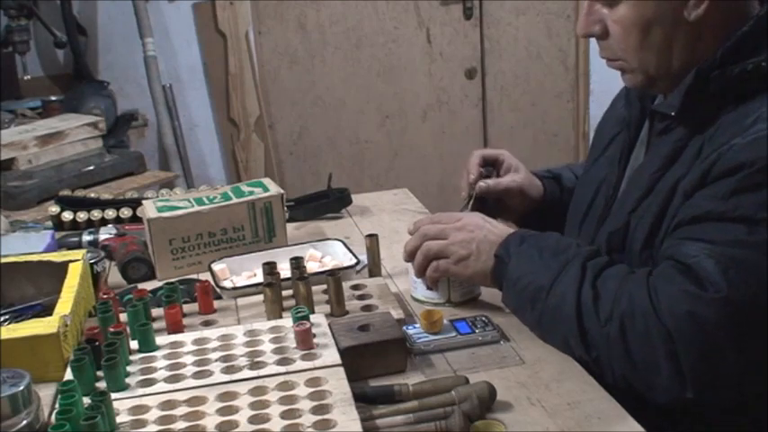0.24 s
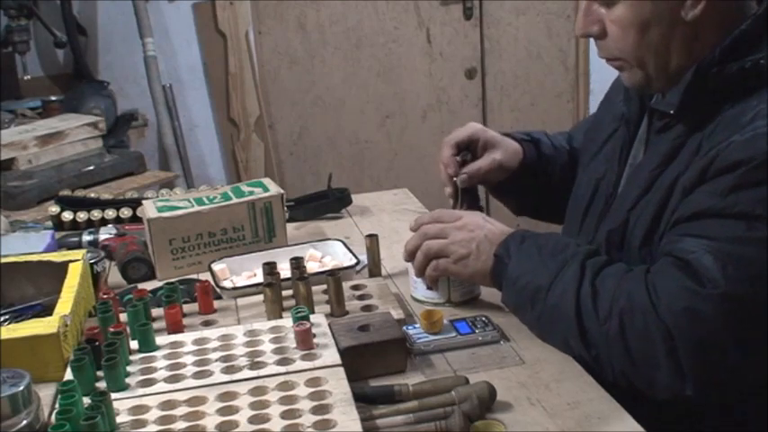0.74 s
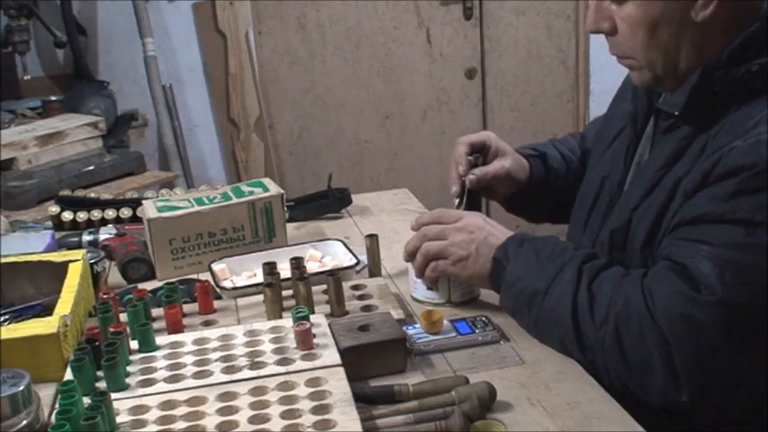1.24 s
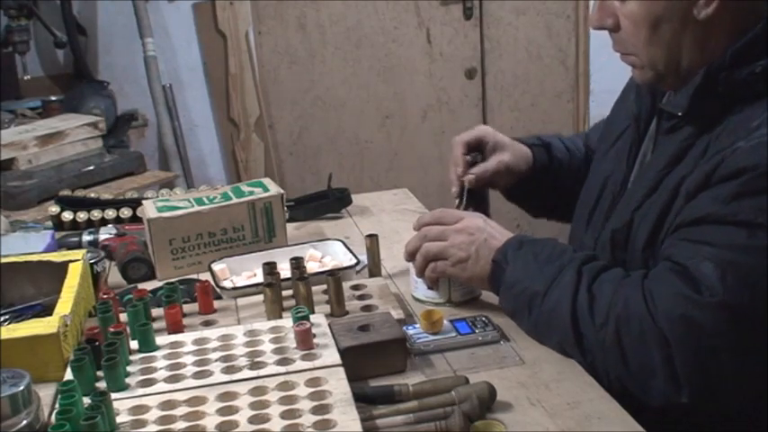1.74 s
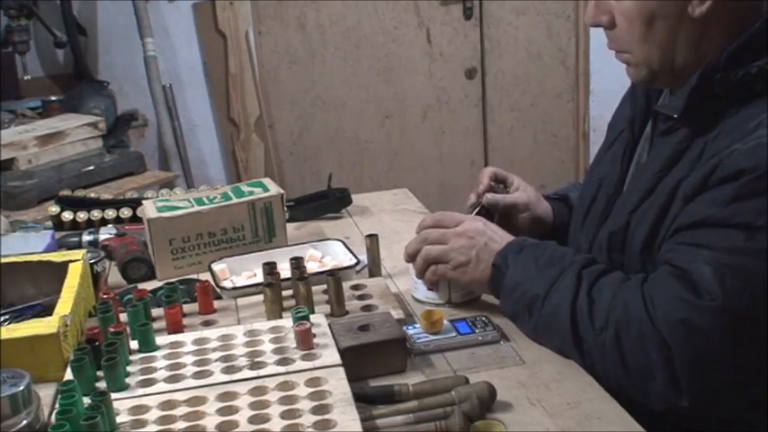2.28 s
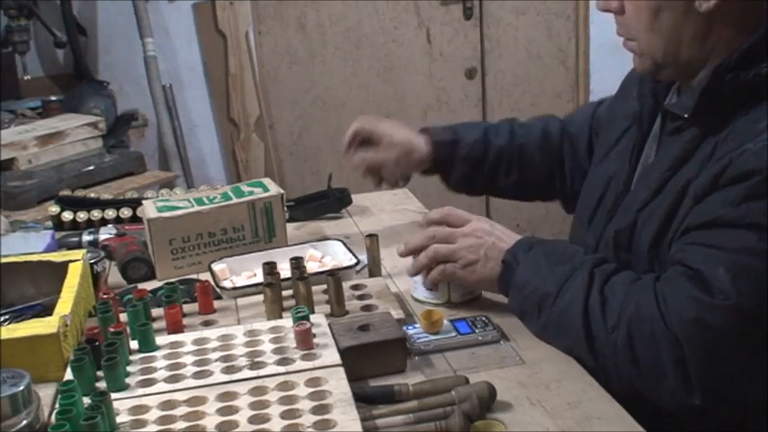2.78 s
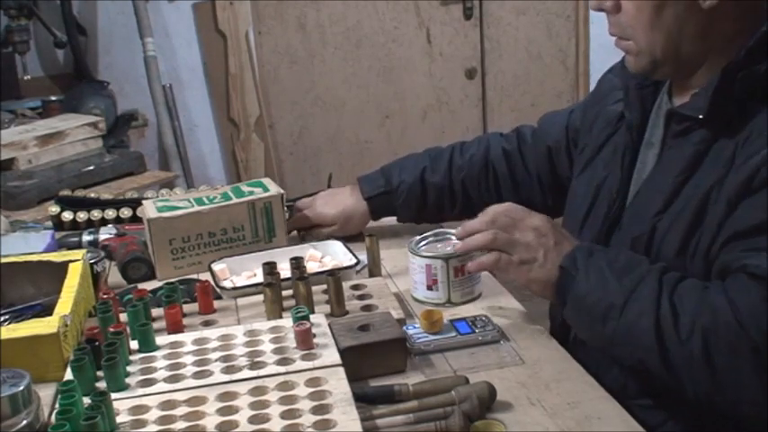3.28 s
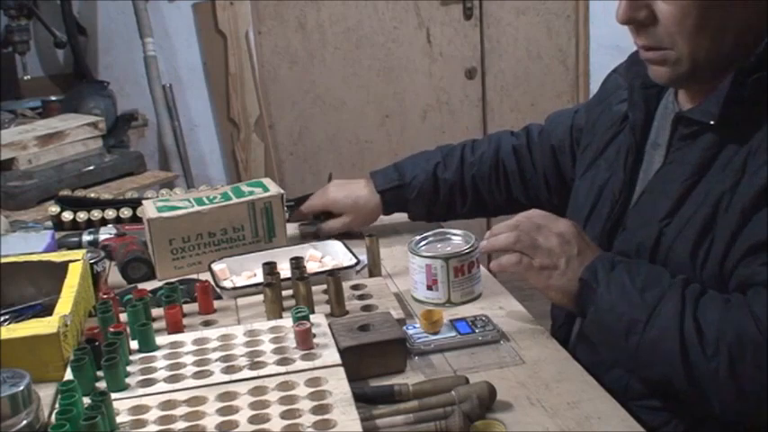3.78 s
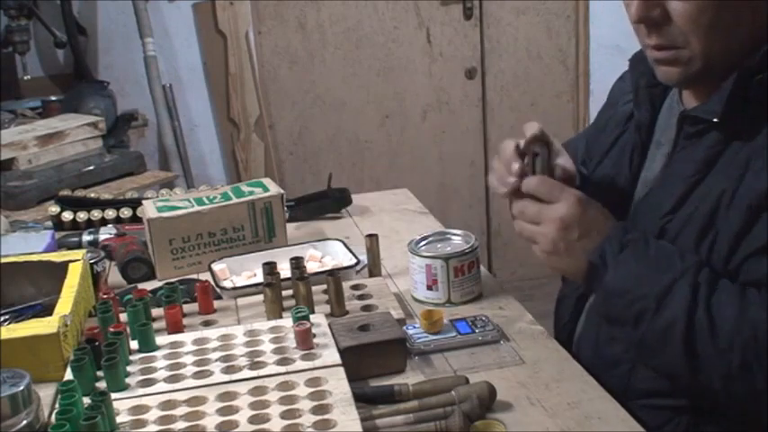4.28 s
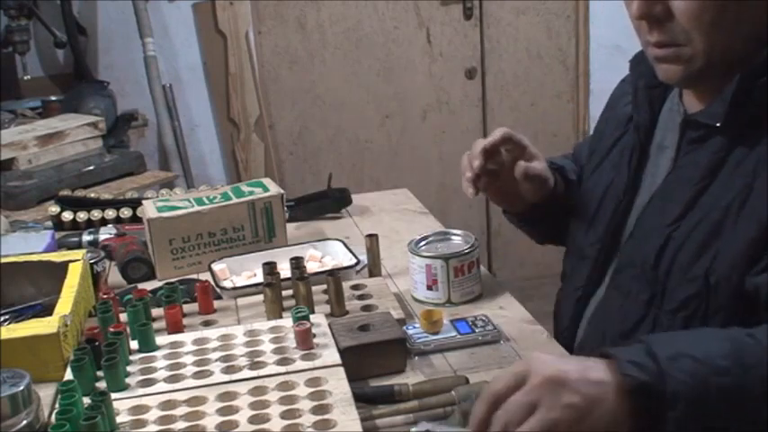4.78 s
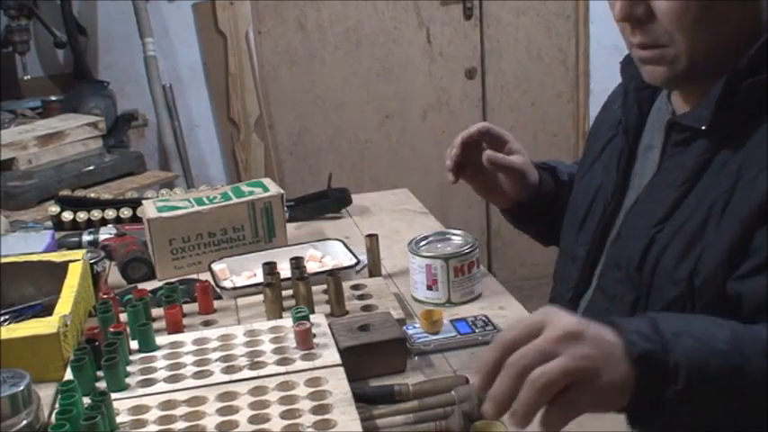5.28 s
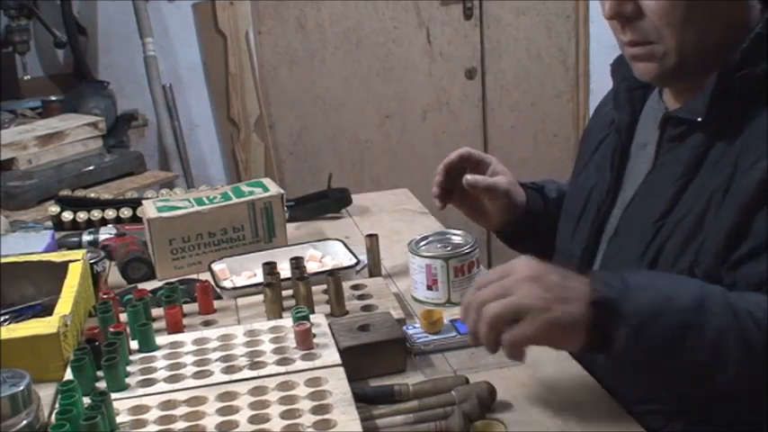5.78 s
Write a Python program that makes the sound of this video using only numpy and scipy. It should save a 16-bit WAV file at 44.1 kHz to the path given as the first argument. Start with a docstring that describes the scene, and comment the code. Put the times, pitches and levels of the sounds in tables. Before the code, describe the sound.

Sharp clinks and ringing snaps of a knife levering a small tin's lid, followed by hollow knocks on a wooden workbench.

```python
"""Knife on a paint tin lid

A knife levers at the lid of a small tin on a wooden bench: the blade slips with a crack, tin and steel
ring, the tin thumps back down. A tool knocks on the bench, the knife snaps shut, the tool is laid down.
A padded jacket rustles with the arm; the small, hard workshop rings after each blow over a faint hum."""
import sys
import numpy as np
from scipy import signal
from scipy.fft import rfft, irfft, next_fast_len
from scipy.io import wavfile
from scipy.ndimage import uniform_filter1d

SR = 44100
rng = np.random.default_rng(int(sys.argv[2]) if len(sys.argv) > 2 else 0)


def file_out(sig):
    """Save sig as 16-bit WAV at sys.argv[1]."""
    # one column per channel
    cols = np.atleast_2d(sig).T
    # limit, then scale
    lim = np.clip(cols, -1, 1)
    pcm = np.round(lim * 32767).astype(np.int16)
    wavfile.write(sys.argv[1], SR, pcm)


N = 266275
TIME_S = np.arange(N) / SR
RING_S = np.arange(40960) / SR  # time axis of one blow
# low room modes: pitch_hz, level_db, t60_s
ROOM_MODES = [(97, -19, .55), (140, -16, .55), (173, -8, .52), (288, 1.5, .42), (416, -1, .42)]
# bright spectrum of fabric and knife click: freq_hz, gain_db
BRIGHT_COLOUR = [(200, -15.5), (900, 0), (2000, 0), (3200, 0), (5000, -1.5), (8000, -1), (11000, -8),
                 (13000, -3), (16000, -16.5)]
# sleeve flick, then knife click: start_s, level_db, contact_s
SNAPS = [(2.799, -28, 0.0086), (4.478, -27, 0.0032)]


def undb(db):
    """Decibels to gain."""
    return 10 ** (np.asarray(db) / 20)


def add(out, start_s, sound):
    """Mix a sound in at start_s."""
    start = max(int(start_s * SR), 0)
    out[:, start:start + sound.shape[1]] += sound[:, :N - start]


def shape(x, points):
    """Minimum-phase filter through (freq_hz, gain_db) points."""
    n = next_fast_len(x.shape[-1], True)
    hz, db = np.transpose(points)
    bins_hz = np.arange(n // 2 + 1) * SR / n
    gain_db = np.interp(np.log(bins_hz + 1), np.log(hz), db)
    cepstrum = irfft(np.log(undb(gain_db)), n)
    cepstrum[1:n // 2] *= 2
    cepstrum[n // 2 + 1:] = 0
    return irfft(rfft(x, n) * np.exp(rfft(cepstrum)), n)[:, :x.shape[-1]]


def diffuse(size, width):
    """Stereo noise; width is side over mid."""
    mid, side = rng.standard_normal((2, size))
    return np.array([mid + width * side, mid - width * side])


def walk(rate_hz):
    """Slow random drift, spread near 1."""
    knots = rng.standard_normal(4096)
    return np.interp(TIME_S * rate_hz, np.arange(len(knots)), knots)


def ripple(depth_db, step_hz, from_hz):
    """Crowded upper resonances as (freq_hz, gain_db) points."""
    hz = np.arange(1, 400) * step_hz
    return list(zip(hz, depth_db * rng.standard_normal(len(hz)) * np.clip(hz / from_hz - 1, 0, 1)))


def flatten(x, smooth_hz):
    """Level the broad humps of a burst's spectrum, at unit energy."""
    power = uniform_filter1d(abs(rfft(x.mean(axis=0))) ** 2, int(smooth_hz * x.shape[1] / SR))
    hz = np.linspace(1, SR / 2, len(power))
    return shape(x, np.column_stack([hz, -10 * np.log10(abs(power) + 1e-9)]))


def room_tail(slips, t60_s):
    """Slip energy fills the room and dies away."""
    stored = signal.lfilter([1], [1, -np.exp(-2 * np.log(1000) / (t60_s * SR))], slips ** 2)
    return np.sqrt(stored / stored.sum()) * diffuse(len(RING_S), width=.21)


def blow(contact_s, direct, t60_s, grit_db):
    """A burst of tiny slips plus its room tail, whose treble dies first."""
    grit = undb(grit_db * np.repeat(rng.standard_normal(len(RING_S) // 32), 32))
    slips = np.exp(-RING_S / contact_s) * grit
    crack = flatten(slips * diffuse(len(RING_S), width=.1), smooth_hz=486)
    low, high = (signal.butter(2, 5300, kind, fs=SR, output="sos") for kind in ("low", "high"))
    room = signal.sosfilt(low, room_tail(slips, t60_s))
    room += signal.sosfilt(high, room_tail(slips, .75 * t60_s))
    return (direct * crack + room) / np.hypot(direct, 1)


def ring(modes, swell_s, scatter_db, detune=.0022):
    """Decaying modes that swell as reflections gather; each blow weights them anew."""
    side_rad = .17 * np.array([[1], [-1]])
    out = 0
    for hz, db, t60_s in modes:
        size, pitch, lag = rng.standard_normal(3)
        phase = 2 * np.pi * (hz * (1 + detune * pitch) * RING_S + rng.random())
        decay = undb(db + scatter_db * size) * np.exp(-np.log(1000) * RING_S / t60_s)
        out = out + decay * np.sin(phase + lag * side_rad)
    return out * (1 - np.exp(-RING_S / swell_s))


def tone(x, centres_hz, bass_db, body_db, *upper_db):
    """A heavy push brings out bass, a sharp edge treble; the third band stays at 0 dB."""
    return shape(x, list(zip(centres_hz, (bass_db, body_db, 0, *upper_db))))


def add_snap(out, start_s, db, contact_s):
    """Mix in a short, bright burst."""
    burst = blow(contact_s, direct=1, t60_s=.25, grit_db=-1)
    add(out, start_s, undb(db) * shape(burst, BRIGHT_COLOUR))


def workshop():
    """Quiet room air from all around and a faint, wavering hum."""
    # air spectrum: freq_hz, gain_db
    air_colour = [(15, -43.5), (25, -1.5), (107, -10.5), (126, -17.5), (305, -7.5), (359, -12.5),
                  (567, -10), (722, -12), (782, -4), (848, -13), (1170, -10), (1410, -15), (2360, -16),
                  (3830, -21.5), (15500, -30.5)]
    # hum partials: pitch_hz, relative_db
    partials = [(769.8, -78.5), (909.8, -75.5), (1180, -86), (1330, -86), (1680, -88)]
    air = shape(diffuse(N, width=.78), air_colour)
    hum = 0
    for hz, db in partials:
        peak = np.sqrt(2) * undb(db - 2 + 2 * walk(8.8))
        hum += peak * np.sin(2 * np.pi * hz * TIME_S + 1.1 * walk(16))
    return air / air.mean(axis=0).std() * undb(-68 + .5 * walk(6.8)) + hum


def jacket():
    """Smooth fabric slides on itself as the arm speeds up and slows; the sleeve flicks once."""
    # arm movements: middle_s, length_s, level_db
    moves = [(0, .6, -70.5), (1.05, 0.34, -75), (2.3, 1.5, -70.5), (3.13, 1, -63), (4.3, 1.13, -61.5),
             (5.202, 0.67, -68.5), (6, 0.53, -74)]
    rest_db = -78.5
    hiss = shape(diffuse(N, width=.25), BRIGHT_COLOUR)
    speeds = [undb(db) * np.cos(np.pi * np.clip((TIME_S - middle_s) / length_s, -.5, .5))
              for middle_s, length_s, db in moves]
    rub = np.sqrt(undb(rest_db) ** 2 + np.sum(np.square(speeds), axis=0))
    out = hiss / hiss.std() * rub * undb(.8 * walk(32))
    add_snap(out, *SNAPS[0])
    return out


def strike_tin(db, tone_db, contact_s, ring_db, sheet):
    """A blow cracks through the thin sheet and rings the tin; its thrust booms in the room."""
    # tin modes: pitch_hz, level_db, t60_s
    tin_modes = [(481, 0, .36), (715, -15, .33), (790, -6.5, .46), (1130, -11, .25), (1272, -12, .22),
                 (1529, -.5, .27), (1634, -8, .24), (1671, -6, .26), (1883, -7.5, .24)]
    # crack spectrum: freq_hz, gain_db
    tin_colour = [(30, -9.5), (100, -12), (200, -8.5), (300, 4.5), (450, 10), (620, 9), (800, 9.5),
                  (1100, 12), (1550, 19), (1950, 7), (2350, 0.5), (4000, -4), (5800, -2.5), (9500, -14),
                  (13000, -18.5), (15000, -23)]
    # band centres: bass_hz, body_hz, neutral_hz, treble_hz, edge_hz
    bands_hz = [280, 850, 1700, 5500, 12500]
    burst = blow(contact_s, direct=.9, t60_s=.35, grit_db=5)
    crack = shape(shape(burst, tin_colour), sheet)
    # a gentle push favours the lowest mode
    modes = [(hz, mode_db + .2 * min(db, 0) * np.log2(hz / tin_modes[0][0]), t60_s)
             for hz, mode_db, t60_s in tin_modes]
    tin = undb(ring_db) * ring(modes, swell_s=.0008, scatter_db=2)
    boom = undb(db + tone_db[0] - 49.5) * ring(ROOM_MODES, swell_s=.003, scatter_db=1.5)
    return undb(db) * tone(crack, bands_hz, *tone_db) + tin + boom


def knife_on_lid():
    """The blade nudges the rim, slips and lets the tin drop back; at last it scrapes off."""
    # blade slips: start_s, level_db, body_db, treble_db, contact_s, ring_db, drop_delay_s, drop_db
    slips = [(0.097, 2.5, -10.5, 16.5, 0.012, -34.5, 0.098, -6.2),
             (0.4299, -3, 7.5, -1, 0.0037, -63, .18, -35), (1.5126, 3.5, -5, -4, 0.0067, -23.5, .078, -13),
             (2.0526, 6, -2, 1, 0.005, -26, 0.032, 2)]
    # blade seeking grip: start_s, level_db, bass_db, contact_s, ring_db
    nudges = [(.001, -36, 17.5, .033, -65.5), (.934, -39.5, 31.5, .008, -81), (.972, -38, 10, .0053, -49.5),
              (1.339, -43.5, 24, .016, -73), (1.805, -26.5, 23, 0.037, -55), (1.851, -22, 15.5, .0059, -50),
              (2.008, -33.5, 8, 0.012, -66.5)]
    out = np.zeros((2, N))
    sheet = ripple(depth_db=4.2, step_hz=60, from_hz=1300)
    for start_s, db, body_db, treble_db, contact_s, ring_db, drop_delay_s, drop_db in slips:
        slip_tone_db = (-6.5, body_db, treble_db, .69 * treble_db)  # bass, body, treble, edge
        add(out, start_s, strike_tin(db, slip_tone_db, contact_s, ring_db, sheet))
        # gentler drop: larger share of low end and ring, longer contact
        soft_db = -.52 * np.clip(drop_db, -19, 0)
        drop_tone_db = (13.7 + soft_db, 6.9 + soft_db, 2.5, 7.8)
        landing_s = .0086 * undb(-.27 * drop_db)
        thump = strike_tin(drop_db, drop_tone_db, landing_s, drop_db + soft_db - 29.5, sheet)
        add(out, start_s + drop_delay_s, thump)
    for start_s, db, bass_db, contact_s, ring_db in nudges:
        add(out, start_s, strike_tin(db, (bass_db, 15.5, 2, 5), contact_s, ring_db, sheet))
    lift_off = strike_tin(db=-19, tone_db=(8.1, 8.2, 8.5, 15.7), contact_s=.018, ring_db=-50.5, sheet=sheet)
    add(out, 2.472, lift_off)
    return signal.sosfilt(signal.butter(2, 14300, fs=SR, output="sos"), out)


def blade_and_rim():
    """The freed blade sings until the grip damps it; the rim rings at pitches the contact favours."""
    # blade and rim modes: pitch_hz, level_db, t60_s
    blade_modes = [(3652, 0, .3), (5340, -18, .2), (5850, -15, .22), (7232, -2, .3), (8404, -17.5, .42)]
    rim_modes = [(1746, -4, .27), (2245, -6, .28), (4395, -3, .26), (5350, -7, .22), (5496, -5, .26),
                 (5645, -6, .25), (6970, -10, .3), (7400, -10, .22), (9270, -17, .16), (10900, -12, .22)]
    # blade springs free: start_s, level_db, tilt_db_per_octave, t60_ratio
    twangs = [(.0975, -15.5, -0.5, 0.71), (1.513, -41, -6, 1.46), (2.053, -41, -8.5, .8),
              (2.485, -49.5, -25, 1.8)]
    # edge catches rim: start_s, level_db, focus_hz
    pings = [(.197, -35, 4400), (1.594, -39, 5500), (2.053, -36, 5600), (2.474, -33.5, 1750)]
    out = np.zeros((2, N))
    for start_s, db, tilt_db_per_octave, t60_ratio in twangs:
        modes = [(hz, mode_db + tilt_db_per_octave * np.log2(hz / blade_modes[0][0]), t60_s * t60_ratio)
                 for hz, mode_db, t60_s in blade_modes]
        add(out, start_s, undb(db) * ring(modes, swell_s=.02, scatter_db=.6, detune=.0004))
    for start_s, db, focus_hz in pings:
        modes = [(hz, mode_db - 12 * min(abs(np.log2(hz / focus_hz)) / .4, 1), t60_s)
                 for hz, mode_db, t60_s in rim_modes]
        add(out, start_s, undb(db) * ring(modes, swell_s=.006, scatter_db=.7, detune=.001))
    return out


def rebounds(start_s, db, flight_s):
    """Times and levels of a blow and two ever quicker, weaker rebounds."""
    for k in range(3):
        yield start_s, db - 9.5 * k
        start_s += flight_s * .83 ** k


def tool_on_bench():
    """Dull knocks ring the wooden top, most where hollow; metal on it sings on after the last."""
    # tool knocks: start_s, level_db, hollow_db, contact_s, flight_s
    knocks = [(3.172, -0.5, -0.5, 0.0076, .022), (3.344, -28.5, 7, .004, .016),
              (3.375, 1.5, 4, 0.0077, .021), (3.6054, 0, 6.5, 0.011, .0435), (3.849, -31, 3, 0.022, .03),
              (5.0747, 6, -4, 0.0098, 0.038), (5.2306, 3.5, -5.5, 0.013, .034)]
    # modes of the top and of metal on it: pitch_hz, level_db, t60_s
    board_modes = [(139.8, -21, 0.77), (321, -6, 0.27), (445, 1, .33), (502, 6, 0.24), (556, 1.5, 0.29),
                   (679, -17, 0.3), (804, -17, .3), (937, 6.5, 0.24), (978, 1.5, 0.27), (1095, -1, 0.28),
                   (1220, -12.5, .3), (2420, -18, 0.2), (2990, -15.5, .22), (3320, -24.5, 0.13)]
    metal_modes = [(1147, -3, 2.8), (1162, -1, 2.3), (2395, -7, 2.2), (2430, -8, 3)]
    # thud spectrum: freq_hz, gain_db
    wood_colour = [(30, -9), (100, -1), (200, 9.5), (300, 17.5), (520, 19), (1000, 15.5), (1600, 10),
                   (2100, 0), (3000, -0.5), (4200, -10.5), (7000, -18), (10000, -32), (15000, -32)]
    # band centres: bass_hz, body_hz, neutral_hz, treble_hz
    bands_hz = [280, 850, 1700, 2900]
    out = np.zeros((2, N))
    planks = ripple(depth_db=3.5, step_hz=73.55, from_hz=2300)
    for first_s, first_db, hollow_db, contact_s, flight_s in knocks:
        for start_s, db in rebounds(first_s, first_db, flight_s):
            bass_db = -5 + .53 * hollow_db - .4 * min(db, 0)  # gentler knocks are bassier
            treble_db = -2.5 + .63 * hollow_db
            burst = blow(contact_s, direct=.84, t60_s=.34, grit_db=5.5)
            wood = shape(shape(burst, wood_colour), planks)
            thud = tone(wood, bands_hz, bass_db, hollow_db, treble_db)
            board = ring(board_modes, swell_s=.0006, scatter_db=1, detune=.0041)
            boom = undb(bass_db - 42) * ring(ROOM_MODES, swell_s=.0078, scatter_db=2)
            add(out, start_s, undb(db) * (thud + undb(1.53 * hollow_db - 39.5) * board + boom))
    metal = ring(metal_modes, swell_s=.01, scatter_db=2, detune=.000494)
    add(out, knocks[-1][0], undb(-64) * metal)
    return out


def knife_shut():
    """A small click and steel ping as the folding knife snaps shut."""
    # knife modes: pitch_hz, level_db, t60_s
    knife_modes = [(3210, 0, 0.17), (6535, -5, .15), (8748, 1, .15)]
    out = np.zeros((2, N))
    add_snap(out, *SNAPS[1])
    add(out, 4.479, undb(-56.5) * ring(knife_modes, swell_s=.001, scatter_db=2))
    return out


def scene():
    """All sources, the bench slightly to the left."""
    pan_db = np.array([[.25], [-.25]])
    bench = (knife_on_lid() + blade_and_rim() + tool_on_bench()) * undb(pan_db)
    return bench + jacket() + knife_shut() + workshop()


def record(dry):
    """Close microphones hear the bass alike; deep rumble and the very top are cut."""
    # stereo width: freq_hz, side_gain_db
    spread = [(60, -12.5), (250, -4.5), (700, -2.5), (2000, 0), (5000, -3.5), (8000, -0.5), (12000, -8.5)]
    mid = dry.mean(axis=0)
    sound = mid + shape(dry - mid, spread)
    sound = signal.sosfilt(signal.butter(2, 32, "high", fs=SR, output="sos"), sound)
    return signal.sosfilt(signal.ellip(8, .2, 70, 15450, fs=SR, output="sos"), sound)


dry = scene()
out = record(dry)
file_out(out)
```